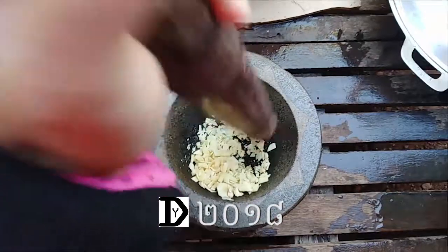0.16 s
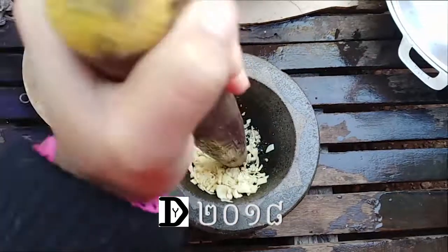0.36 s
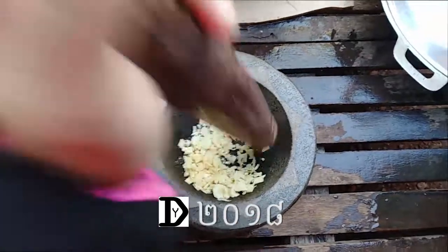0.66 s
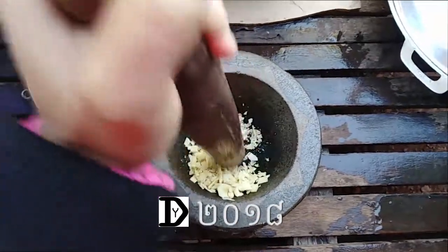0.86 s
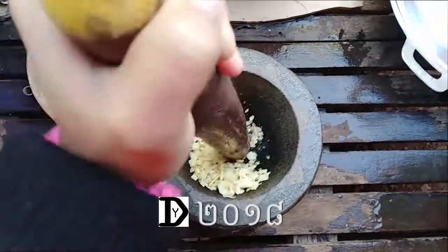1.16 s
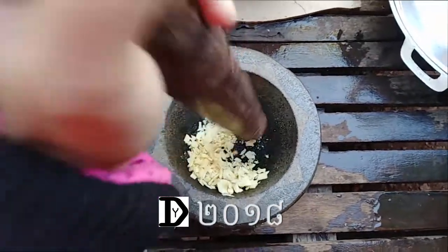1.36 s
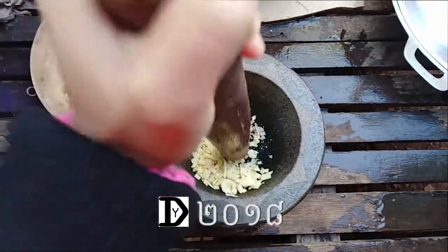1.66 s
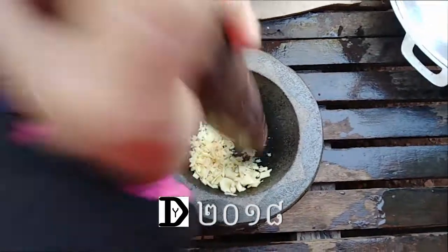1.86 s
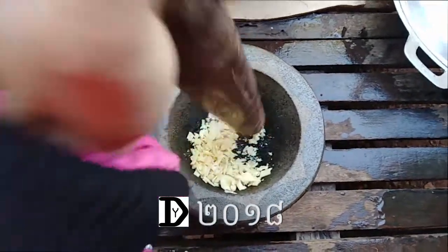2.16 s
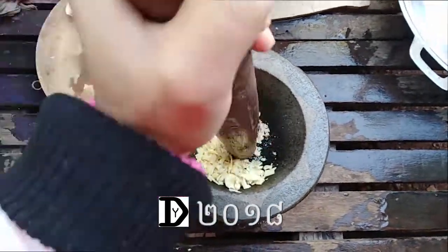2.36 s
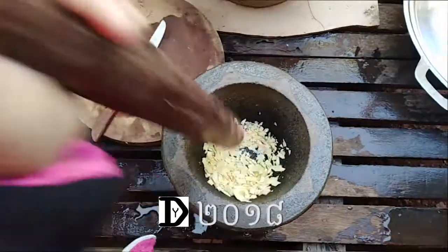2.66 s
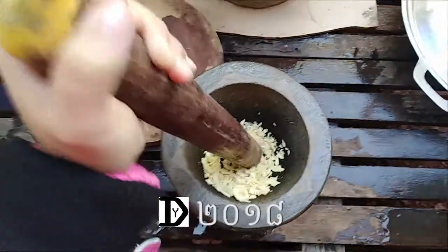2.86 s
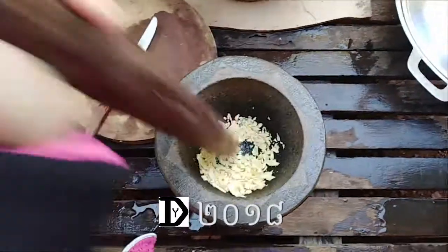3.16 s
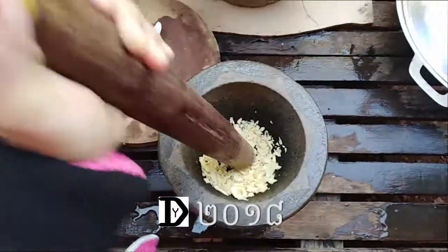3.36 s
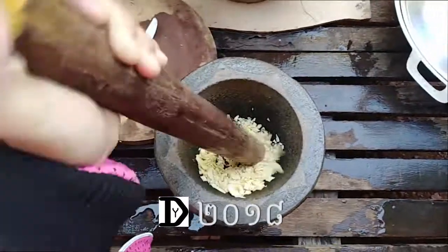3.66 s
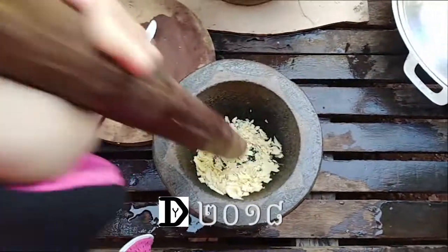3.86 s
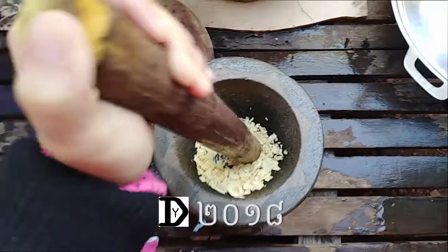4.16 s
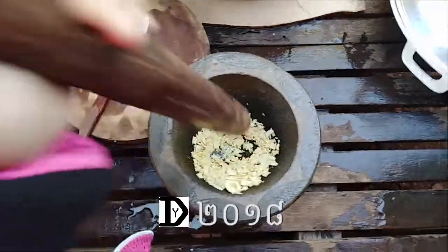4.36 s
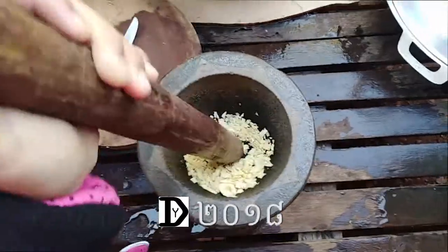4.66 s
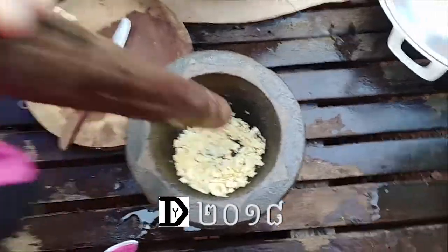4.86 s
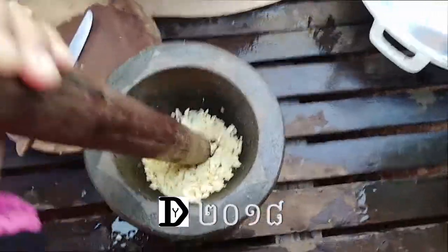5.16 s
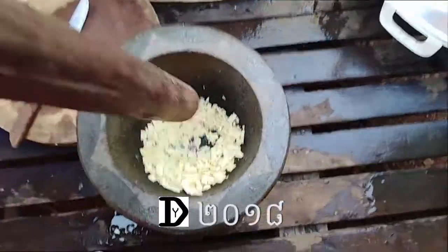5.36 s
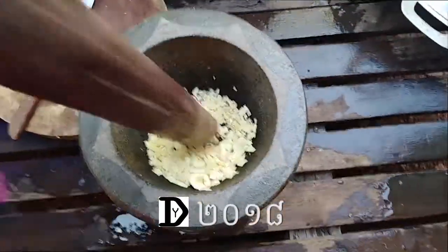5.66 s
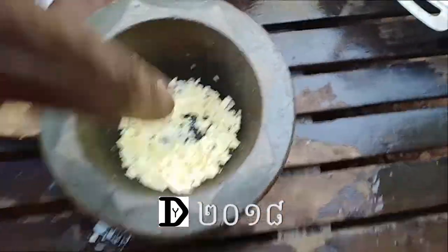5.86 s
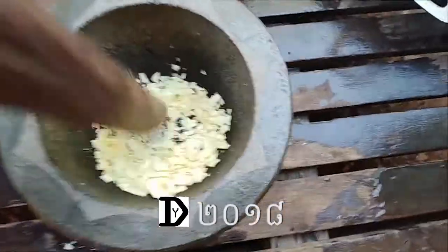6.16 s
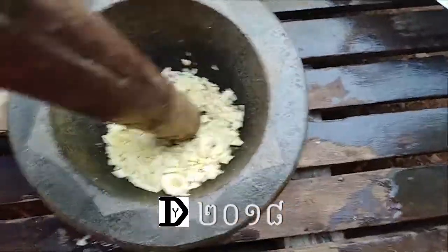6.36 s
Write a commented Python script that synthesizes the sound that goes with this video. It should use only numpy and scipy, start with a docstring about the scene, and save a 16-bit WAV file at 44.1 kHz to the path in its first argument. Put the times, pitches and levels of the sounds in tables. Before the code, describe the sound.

Outdoors and very close, a heavy wooden pestle pounds chopped roots in a stone mortar, about two or three blows a second. Each lands with a crisp wet crunch, a woody knock and a short stony ring, then small rebounds rattle the slats beneath. Early blows vary from dull to ringing; the last ones ring hard and slightly overload the stereo microphone. Birds peep faintly in the second half.

```python
"""In an open yard a wooden pestle pounds chopped roots in a stone mortar that stands on wooden slats.
Each blow rings the bowl as fading sine tones, crushes the roots in sprays of clicks and shakes the slats;
small rebounds follow. Birds peep as gliding tones, and an insect trills far off over a low rumble of noise.
Two microphone ports of unlike colour listen close by and overload on hard blows."""
import sys
import numpy as np
from scipy import signal
from scipy.io import wavfile
from scipy.ndimage import uniform_filter1d

SR = 44100
rng = np.random.default_rng(int(sys.argv[2]) if len(sys.argv) > 2 else 0)


def natural_amplitude(level_db):
    """Convert a level in decibels to a linear amplitude factor, elementwise."""
    exponent = np.asarray(level_db, float) / 20
    return 10 ** exponent


def store_pcm(level_fs):
    """Save levels as 16-bit WAV."""
    pcm = np.round(np.clip(level_fs, -1, 1) * 32767).astype(np.int16)
    wavfile.write(sys.argv[1], SR, np.atleast_2d(pcm).T)


N = 286650   # length in samples

# Levels in the tables are relative: each sound's function may add an overall gain.
# slow background levels: t/s, rumble level/dB, yard murmur level/dB, insect level/dB
AMBIENCE = [(0, -47.5, -43, -61.5), (0.35, -56, -68, -100), (0.801, -53.5, -62.5, -93),
            (1.2, -51.5, -77, -82), (1.451, -53, -65, -92), (1.65, -49.5, -57, -79.5),
            (2.1, -50.5, -60.5, -73.5), (2.449, -49.5, -65, -73.5), (2.75, -41.5, -54, -83.5),
            (3.3, -43, -51, -74), (3.75, -45.5, -57, -73), (4.2, -42.5, -58, -81), (4.7, -45, -55, -77),
            (5.2, -46, -55, -78.5), (5.65, -45, -54, -78.5), (6.1, -49.5, -51, -82), (6.5, -43, -64, -84)]
# colour of the far rumble: f/Hz, level per Hz/dB
RUMBLE_COLOUR = [(18, -41), (30, -24), (74, 5), (130, 9.5), (241, -5.5), (278, -6.5), (353, -4.5),
                 (700, -22.5), (910, -58.5), (1540, -120)]
# colour of the yard murmur: f/Hz, level per Hz/dB
MURMUR_COLOUR = [(350, -18.5), (600, -10.5), (733, 1), (1340, -1.5), (2000, -10), (2630, 0), (4460, -18),
                 (4870, -36.5), (5950, -37), (6490, -19.5), (12000, -45), (15600, -80.5), (22000, -120)]
# left-right balance of rumble and murmur: f/Hz, left minus right/dB
BACKGROUND_LEAN = [(60, 6), (110, 1), (200, 2), (380, 5.5), (700, 5), (1290, 11.5), (2380, 22), (4400, -7),
                   (8120, -8.5), (15000, 1)]
# how alike rumble and murmur are at the two ports: f/Hz, likeness (1 same, 0 unrelated, -1 opposite)
LIKENESS = [(60, 0.98), (130, 0.94), (290, 1), (640, 0.76), (1410, 0.63), (3100, -0.47), (6820, 0.18),
            (15000, -0.05)]
# a low hum swells and fades: t/s, level/dB
HUM = [(0, -66.5), (2.498, -63), (2.9, -44.5), (3.3, -47), (3.8, -54), (4.3, -62.5), (6.5, -74.5)]
# bird peeps: t/s, length/s, first f/Hz, f approached at the end/Hz, level/dB
PEEPS = [(0.148, 0.15, 2600, 1980, -67.5), (3.084, 0.045, 4020, 3720, -61),
         (3.093, 0.069, 3200, 2800, -46.5), (3.132, 0.16, 2610, 2325, -42.5),
         (3.319, 0.077, 3390, 2975, -50.5), (3.349, .17, 2705, 2330, -46), (3.56, 0.07, 3390, 3300, -53.5),
         (3.6, 0.13, 2492, 2350, -45), (3.809, 0.084, 3150, 2850, -47), (3.863, 0.069, 2600, 2286, -42.5),
         (4.092, .14, 2500, 2300, -48), (4.403, 0.093, 3250, 2750, -49.5), (4.467, .09, 2550, 2300, -50),
         (4.849, 0.045, 3760, 3750, -53.5), (5.327, 0.16, 3225, 2380, -45), (5.799, 0.06, 3760, 3660, -55),
         (5.809, 0.07, 7450, 7350, -67), (6.308, 0.19, 3180, 3260, -56)]
# yard echoes: f/Hz, time to fall 60 dB/s, left level/dB, right level/dB
YARD = [(100, 0.21, -23, -26), (305, 0.45, -11.5, -10.5), (1070, 0.38, -14, -25), (2600, 0.33, -16, -9),
        (4640, 0.48, -9, -8), (8400, 0.58, -15, -20), (14200, 0.58, -32.5, -25.5)]
# the mortar settles back on the slats: t/s, rattle level/dB, slat thud level/dB
REBOUNDS = [(0.012, -22, -30), (0.059, -23.5, -62), (0.0874, -25.5, -51.5), (0.38, -39.5, -39.5),
            (0.4325, -34, -39), (0.456, -22.5, -51), (0.852, -30.5, -44.5), (1.5522, -26, -37.5),
            (1.5846, -23.5, -42.5), (1.6068, -17.5, -42), (2.028, -20.5, -37), (2.0606, -29, -65.5),
            (2.4428, -26.5, -46), (2.5045, -28, -42.5), (2.828, -23, -53), (2.873, -22, -56),
            (3.297, -24, -39.5), (3.3714, -27, -51.5), (3.7533, -27, -36.5), (3.7815, -26, -49),
            (4.183, -25, -43), (4.656, -19.5, -36), (4.7533, -28, -51.5), (5.155, -19, -31.5),
            (5.199, -34, -57), (5.232, -33, -50), (5.581, -18.5, -33), (5.679, -33, -46),
            (5.985, -34.5, -51), (6.0128, -21, -43), (6.0387, -26.5, -36), (6.133, -26, -43.5)]
# the pestle crushes roots as it lands, often twice:
# t/s, rattle level/dB, crack level/dB, slat thud level/dB, lean/dB (twice the left minus right heard)
CRUSHES = [(0.3245, -15.5, -33, -27, 9), (0.3464, -25, -41.5, -45.5, -6), (0.7113, -21.5, -40, -27, 7),
           (0.7283, -22.5, -44.5, -53, 6), (1.1113, -15, -26, -19.5, 16), (1.4952, -20.5, -41.5, -28, 1),
           (1.519, -28.5, -48.5, -57, 6), (1.8906, -25, -23, -21.5, 16), (1.922, -15, -66, -56, 11),
           (2.3072, -8.5, -23, -21, 19), (2.733, -27.5, -64, -49.5, 16), (2.74, -16.5, -39, -32.5, -11),
           (2.7708, -24.5, -38.5, -30.5, -1), (3.2104, -13, -33, -25, -3), (3.635, -35, -76, -55.5, -2),
           (3.6444, -24, -40, -53, -16), (3.6549, -14.5, -36.5, -32, -3.5), (4.0754, -8, -26.5, -25, 1),
           (4.5483, -22, -27, -23, -0.5), (5.0227, -14, -23.5, -19.5, -4.5), (5.4717, -20, -25.5, -24, 3),
           (5.926, -11, -32, -25.5, -1.5), (5.9399, -56, -34, -61, -10.5), (6.3637, -8, -18.5, -18, 11)]
# what rattles on the slats: f/Hz, width/Hz, left level/dB, right level/dB
RATTLE = [(835, 760, -6, -12), (1650, 750, -4.5, -13), (2600, 440, 1, -22.5), (3300, 550, 0.5, -7),
          (4114, 250, 2, -11), (4847, 450, -1, -2), (6930, 1560, -9, -5), (9660, 1100, -22, -20.5),
          (12000, 2300, -27, -25.5)]
# ringing tones (modes) of the slats: f/Hz, level/dB, time to fall 60 dB/s
SLATS = [(74, -12.5, 0.36), (114, -9, 0.088), (154, -3.5, 0.098), (189.6, -1.5, 0.1), (245, 0.5, 0.12),
         (287.2, -4, 0.077), (334.3, -1, 0.13), (383.5, 0, 0.066), (446.7, -6.5, 0.082), (512, -0.5, 0.015)]
# crunch colour at each port: f/Hz, left level per Hz/dB, right level per Hz/dB
GRIT = [(304, 12, -3.5), (1030, 1, -12), (1890, 4.5, 9.5), (2600, 14, -14.5), (3500, -11, -5.5),
        (4915, -22, -7), (6880, -14.5, 10), (9050, -9.5, -1), (13800, -8, -12.5), (15000, -27.5, -51)]
# buzz of the rocking mortar: low f/Hz, high f/Hz, level/dB, time to fall 60 dB/s, left minus right/dB
BUZZ = [(630, 1280, 3, 0.28, 2.5), (1110, 1230, 9.5, .17, 3.5), (1570, 1820, 10.5, 0.22, 9)]
# pestle blows: t/s, stone ring level/dB, low knock level/dB, high knock level/dB, ring f/Hz
BLOWS = [(0.3254, -15.5, -27, -24.5, 2530), (0.7155, -22.5, -28.5, -23, 2576),
         (1.1132, -6, -21, -12.5, 2570), (1.4967, -27.5, -63, -42.5, 2684),
         (1.8926, -6.5, -13.5, -23, 2615), (2.3086, -3, -11.5, -21.5, 2528), (2.7436, -37, -63, -64, 2620),
         (2.7583, -31.5, -69, -51, 2710), (3.2103, -35, -51, -32, 2590), (3.6448, -26, -61, -46, 2630),
         (3.678, -34.5, -60.5, -50.5, 2600), (4.0768, -20, -32, -25, 2777), (4.398, -66, -48.5, -58, 2530),
         (4.5494, -5, -26, -14.5, 2630), (5.0216, 0.5, -29.5, -11, 2670),
         (5.4722, -3.5, -26.5, -12.5, 2670), (5.9264, -30.5, -46, -33, 2610),
         (6.3648, 1.5, -23, -10.5, 2700)]
# modes of the stone bowl: multiple of ring f, level/dB, time to fall 60 dB/s
MORTAR = [(0.949, -1.5, 0.017), (0.999, 2.5, 0.037), (1.024, -16.5, 0.063), (1.2, -25.5, 0.035),
          (1.551, -12.5, 0.0081)]
# modes of pestle and hollow, the first two being the low and high knock:
# f/Hz, level/dB, time to fall 60 dB/s, left minus right/dB
KNOCK = [(1132.6, -1, 0.089, -7), (1212, 4.5, 0.042, 4), (430, -17, 0.0067, -5.5), (677.6, -13, 0.056, 3.5),
         (769, -2, 0.02, 2), (887, 1.5, 0.0069, -11), (1410, -10.5, 0.044, -6), (1633, -13.5, 0.067, 9.5),
         (1733, -6, 0.032, 8), (1885, -16, 0.16, 5.5), (2100, -20.5, .03, 7.5)]
# where the noise suppressor bites, halving a steady bin: f/Hz, level per bin/dB
HUSH = [(300, -110), (700, -75.5), (2000, -88.5), (5000, -90), (10000, -95), (15000, -97.5)]
EDGES_HZ = 28 * 2 ** np.arange(0, 9.4, 1 / 3)   # edges of third-octave bands

# after each hard blow the murmur swells and the rumble dips slightly
HARD_BLOW_DB, SWELL_PEAK_S, RUMBLE_SWELL_DB, MURMUR_SWELL_DB = -26, 0.15, -1, 8
INSECT_HZ, INSECT_WIDTH_HZ, TRILL_PER_S = 6290, 67, 60
REBOUND_CRACK_DB = -45   # crack level relative to the rattle
REBOUND_LEAN_DB = 3      # twice the left minus right heard
RATTLE_T60_S = 0.15
SLAT_SPREAD = 0.3        # size of the shaking that differs between the ports; the shared part is 1
BUZZ_BUILD_S = 0.019     # the buzz builds up while the clean ring fades
RING_BUZZ_DB, RING_BUZZ_T60_S, RING_BUZZ_WIDTH_HZ = -8.5, 0.18, 130   # rough ring near each blow's pitch
RING_LEAN_DB = 22.5      # the ring is louder at the left port
LEFT_LAG = 10            # samples


def rms_one(x):
    """Scales a sound to an average strength (rms) of 1."""
    return x / np.sqrt(np.mean(x ** 2) + 1e-20)


def at_hz(points, hz):
    """Reads the columns of a table at any frequency, on a log-frequency axis."""
    f, *columns = np.transpose(points)
    return np.array([np.interp(np.log(hz), np.log(f), c) for c in columns])


def drift(rate_hz):
    """Slow random wandering around 0 with spread 1: smoothed noise, 60 points a second."""
    knots = rng.standard_normal(int(N / SR * 60) + 3)
    r = np.exp(-2 * np.pi * min(rate_hz, 25) / 60)
    # run the noise twice and keep the second pass, so the smoother has settled
    slow = signal.lfilter([1], [1, -r], np.r_[knots, knots])[len(knots):]
    return np.interp(np.arange(N) / SR * 60, np.arange(len(slow)), rms_one(slow))


def train(times, db):
    """One click of the given level at each time."""
    out = np.full(N, 1e-18)
    np.add.at(out, np.round(np.asarray(times) * SR).astype(int), natural_amplitude(db))
    return out


def dying(clicks, t60):
    """Each click starts an envelope that falls 60 dB in t60 seconds."""
    return signal.lfilter([1], [1, -natural_amplitude(-60 / (t60 * SR))], clicks)


def bands(white):
    """Third-octave bands with their centres; neighbours come from unrelated noise."""
    for k, (low, high) in enumerate(zip(EDGES_HZ, EDGES_HZ[1:])):
        sos = signal.butter(2, [low, high], "band", fs=SR, output="sos")
        yield np.sqrt(low * high), signal.sosfilt(sos, white[k % 2])


def sides(lean_db):
    """Left and right gains for a left minus right difference in dB."""
    return natural_amplitude(np.array([[lean_db], [-lean_db]]) / 2)


def grains(per_s):
    """Two unrelated stereo sprays of uneven clicks."""
    sizes = natural_amplitude(6.0 * np.minimum(rng.exponential(1, (2, 2, N)), 4))
    sizes = sizes * rng.choice([-1, 1], (2, 2, N))
    return rms_one(sizes * (rng.random((2, 2, N)) < per_s / SR))


def background(rumble_db, murmur_db):
    """Far rumble and a faint patchy murmur: noise bands that are partly alike at the two ports."""
    rumble = murmur = 0
    for hz, (mid, side) in bands(rng.standard_normal((2, 2, N))):
        alike = np.clip(at_hz(LIKENESS, hz), -1, 1)
        pair = np.sqrt(1 + alike) * mid + np.sqrt(1 - alike) * side * [[1], [-1]]
        pair = pair * sides(at_hz(BACKGROUND_LEAN, hz)[0])
        rumble = rumble + natural_amplitude(at_hz(RUMBLE_COLOUR, hz)) * pair
        murmur = murmur + natural_amplitude(at_hz(MURMUR_COLOUR, hz) + 5.2 * drift(10)) * pair
    return natural_amplitude(rumble_db) * rms_one(rumble) + natural_amplitude(murmur_db) * rms_one(murmur)


def swell():
    """A hump of height 1 that peaks shortly after every hard blow."""
    t = np.arange(N) / SR
    ages = [np.maximum(t - s, 0) / SWELL_PEAK_S for s, ring_db, *_ in BLOWS if ring_db > HARD_BLOW_DB]
    return sum((u * np.exp(1 - u)) ** 3.3 for u in ages)


def hum():
    """A low wavering drone: a narrow band of noise."""
    level_db = np.interp(np.arange(N) / SR, *np.transpose(HUM))
    sos = signal.butter(2, [118, 136], "band", fs=SR, output="sos")
    drone = signal.sosfilt(sos, rng.standard_normal(N))
    return natural_amplitude(level_db) * rms_one(drone)


def insect(level_db):
    """A thin noisy whistle that trills: narrow noise with a fast regular beat and a wandering level."""
    edges = [INSECT_HZ - INSECT_WIDTH_HZ / 2, INSECT_HZ + INSECT_WIDTH_HZ / 2]
    sos = signal.butter(2, edges, "band", fs=SR, output="sos")
    tone = signal.sosfilt(sos, rng.standard_normal(N))
    trill = 1 + 0.5 * np.sin(2 * np.pi * TRILL_PER_S * np.arange(N) / SR)
    return natural_amplitude(level_db + 5.0 * drift(5)) * rms_one(tone * trill) * sides(-8.5)


def birds():
    """Rough, mostly falling peeps that glide quickly at first and flatten out, blurred by distance."""
    out = np.zeros(N)
    for s, length, first_hz, last_hz, level_db in PEEPS:
        u = np.linspace(0, 1, int(length * SR))
        hz = last_hz + (first_hz - last_hz) * np.exp(-2.5 * u)
        tone = np.sin(2 * np.pi * np.cumsum(hz) / SR)
        at = round(s * SR)
        out[at:at + len(u)] += natural_amplitude(level_db) * np.sin(np.pi * u) ** 0.56 * tone
    sos = signal.butter(2, 100, fs=SR, output="sos")
    flutter = signal.sosfilt(sos, rng.standard_normal((2, N)))
    rough = 0.7 + 0.67 * rms_one(flutter)
    return out * rough * sides(15.5)


def yard(x):
    """Scattered echoes off walls and ground: each port hears a noise tail that dies band by band."""
    t = np.arange(int(0.7 * SR)) / SR
    tail = 0
    for hz, band in bands(rng.standard_normal((2, 2, len(t)))):
        t60, *level_db = at_hz(YARD, hz)
        tail = tail + natural_amplitude(np.array(level_db)[:, None] - 60 * t / t60) * band
    tail = tail * (1 - np.exp(-(t / 0.0018) ** 2)) * natural_amplitude(-30.5)    # the first echoes need time to return
    return signal.fftconvolve(x, tail, axes=1)[:, :N]


def jolts():
    """Crushes and rebounds as columns: t/s, rattle level/dB, crack level/dB, thud level/dB, lean/dB."""
    soft = [(s, db, db + REBOUND_CRACK_DB, thud_db, REBOUND_LEAN_DB) for s, db, thud_db in REBOUNDS]
    return np.transpose(CRUSHES + soft)


def rattle():
    """Every jolt leaves a dense rattle: a spray of clicks heard through a few broad resonances."""
    envelope, t = np.full((2, N), 1e-18), np.arange(int(0.5 * SR)) / SR
    for s, rattle_db, _, _, lean_db in jolts().T:
        at = round(s * SR)
        decay = natural_amplitude(rattle_db - 60 * t / RATTLE_T60_S)
        onset = (1 - np.exp(-t / 0.00044)) * (1 + 0.28 * np.exp(-t / 0.002))
        envelope[:, at:at + len(t)] += (sides(lean_db / 2) * decay * onset)[:, :N - at]
    excite, out = grains(6500) * envelope * natural_amplitude(1.6 * drift(22)), 0
    for k, (hz, width_hz, *level_db) in enumerate(RATTLE):
        sos = signal.butter(2, [hz - width_hz / 2, hz + width_hz / 2], "band", fs=SR, output="sos")
        out = out + natural_amplitude(np.array(level_db))[:, None] * signal.sosfilt(sos, excite[k % 2])
    return natural_amplitude(-5.5) * out


def slats():
    """Blows and rebounds shake the loose slats: a swell of rattling noise pushes into their low modes."""
    s, _, _, thud_db, _ = jolts()
    push = train(s, thud_db)
    noise = rng.standard_normal((2, 1, N)) + SLAT_SPREAD * rng.standard_normal((2, 2, N))
    shake = (dying(push, 0.28) - dying(push, 0.086)) * noise
    out = 0
    for k, (hz, mode_db, t60) in enumerate(SLATS):
        r, w = natural_amplitude(-60 / (t60 * SR)), 2 * np.pi * hz / SR
        ringing = signal.lfilter([0, np.sin(w)], [1, -2 * r * np.cos(w), r * r], shake[k % 2])
        out = out + natural_amplitude(mode_db) * ringing
    sos = signal.butter(2, 65, "high", fs=SR, output="sos")
    return natural_amplitude(-28) * signal.sosfilt(sos, out) * sides(0.96)


def roots():
    """Fibres snap under the pestle in a short bright crack: a dense burst of clicks, coloured by band."""
    s, _, crack_db, _, lean_db = jolts()
    starts = np.array([train(s, crack_db + lean_db / 4), train(s, crack_db - lean_db / 4)])
    excite = grains(9800) * (dying(starts, 0.012) + natural_amplitude(-18) * dying(starts, 0.024))
    crunch = sum(natural_amplitude(at_hz(GRIT, hz))[:, None] * band for hz, band in bands(excite) if hz > 250)
    return natural_amplitude(18.5) * crunch


def chatter():
    """Blows rock the mortar on the wood; the buzz keeps re-exciting its resonances, so they ring rough."""
    s, ring_db, low_db, high_db, ring_hz = np.transpose(BLOWS)
    knock_db, out = np.maximum(low_db, high_db), 0
    for low_hz, high_hz, level_db, t60, lean_db in BUZZ:
        kicks = train(s, level_db + knock_db)
        spray, _ = grains(6000)
        buzz = spray * (dying(kicks, t60) - dying(kicks, BUZZ_BUILD_S))
        sos = signal.butter(2, [low_hz, high_hz], "band", fs=SR, output="sos")
        out = out + sides(lean_db) * signal.sosfilt(sos, buzz)
    # rough ring: a tone at the latest blow's pitch, made unsteady by slow noise
    kicks = train(s, ring_db + RING_BUZZ_DB)
    latest = np.maximum(np.searchsorted(s, np.arange(N) / SR) - 1, 0)
    tone = np.sin(2 * np.pi * np.cumsum(ring_hz[latest]) / SR)
    sos = signal.butter(2, RING_BUZZ_WIDTH_HZ / 2, fs=SR, output="sos")
    rough = rms_one(signal.sosfilt(sos, rng.standard_normal((2, N))))
    envelope = dying(kicks, RING_BUZZ_T60_S) - dying(kicks, BUZZ_BUILD_S)
    return out + sides(15.3) * tone * rough * envelope


def mortar():
    """Each blow sets all modes of bowl and pestle ringing; the weaker ones vary in strength by chance."""
    out, t = np.zeros((2, N)), np.arange(int(0.4 * SR)) / SR
    contact = 1 - np.exp(-t / 0.0002)    # the contact lasts a fraction of a millisecond
    luck_db = 2.0 * rng.standard_normal((len(BLOWS), len(MORTAR) + len(KNOCK)))
    for (s, ring_db, low_db, high_db, ring_hz), dice_db in zip(BLOWS, luck_db):
        modes = [(k * ring_hz, ring_db + 1.5 + db, db < 0, t60, RING_LEAN_DB) for k, db, t60 in MORTAR]
        # the modes after the two knocks follow the stronger knock
        knock_levels = [low_db, high_db] + [max(low_db, high_db)] * len(KNOCK)
        for blow_db, (hz, db, t60, lean_db) in zip(knock_levels, KNOCK):
            modes.append((hz, blow_db + 9.5 + db, db < 0, t60, lean_db))
        sound = 0
        for (hz, db, weak, t60, lean_db), chance_db in zip(modes, dice_db):
            decay = natural_amplitude(db + weak * chance_db - 60 * t / t60)
            sound = sound + sides(lean_db) * decay * np.sin(2 * np.pi * hz * t)
        at = round(s * SR)
        out[:, at:at + len(t)] -= (sound * contact)[:, :N - at]
    return out


def scene():
    """Adds up the near sounds, the birds, their echoes and the background."""
    s, *columns = np.transpose(AMBIENCE)
    rumble_db, murmur_db, insect_db = [np.interp(np.arange(N) / SR, s, c) for c in columns]
    near = mortar() + chatter() + roots() + rattle() + slats()
    near[0] = np.r_[np.zeros(LEFT_LAG), near[0, :-LEFT_LAG]]    # the left port is a little farther away
    calls, hump = birds(), swell()
    far = background(rumble_db + RUMBLE_SWELL_DB * hump, murmur_db + MURMUR_SWELL_DB * hump)
    echoes = yard(near + natural_amplitude(11.5) * calls)
    return near + calls + echoes + insect(insect_db) + hum() + far


def suppressor(x):
    """Turns down bins that sink towards the threshold, so tails end early and the quiet has holes."""
    hz, _, bins = signal.stft(x, SR, nperseg=1024)
    power = uniform_filter1d(np.abs(bins) ** 2, size=3, axis=2)
    power = uniform_filter1d(power, size=3, axis=1)
    threshold = natural_amplitude(2 * at_hz(HUSH, hz + 1)[0])[:, None]    # doubled dB turns level into power
    gain = np.maximum(power / (power + threshold), natural_amplitude(-31))
    return signal.istft(bins * gain, SR, nperseg=1024)[1][:, :N]


def roll_off(x):
    """The treble ends steeply here."""
    return signal.sosfilt(signal.butter(12, 15630, fs=SR, output="sos"), x)


def record(dry):
    """Hard blows overload with flat tops; the deepest bass and highest treble are cut, faint sound is hushed."""
    top = 0.84    # overload level, full scale is 1
    flat = dry / (1 + np.abs(dry / top) ** 12) ** (1 / 12)
    no_bass = signal.sosfilt(signal.butter(3, 52, "high", fs=SR, output="sos"), flat)
    hushed = suppressor(no_bass)
    mix = signal.sosfilt(signal.butter(8, 14200, fs=SR, output="sos"), hushed)
    mix = np.clip(mix, -1, 1)
    return roll_off(mix)


dry = scene()
out = record(dry)
store_pcm(out)
```